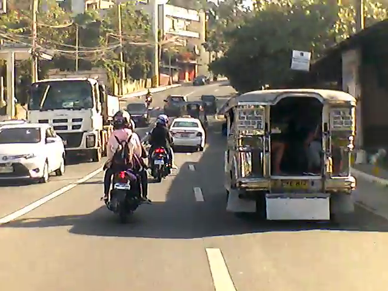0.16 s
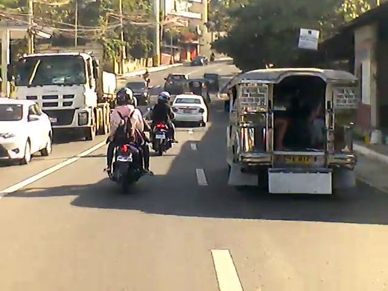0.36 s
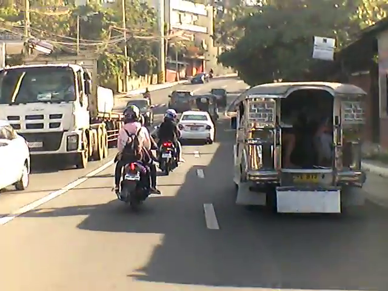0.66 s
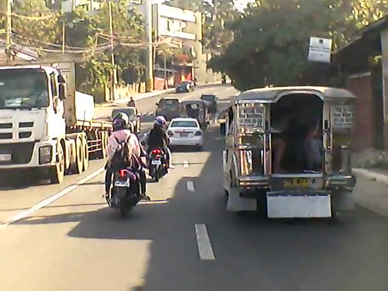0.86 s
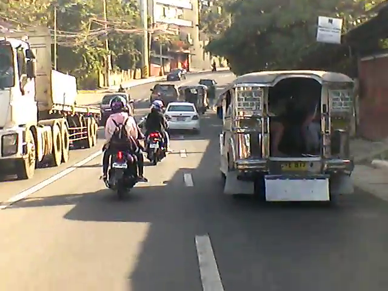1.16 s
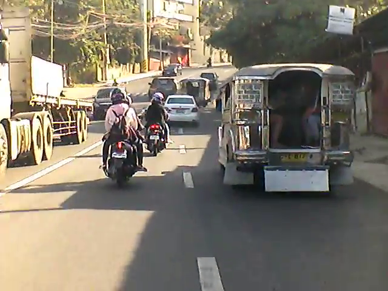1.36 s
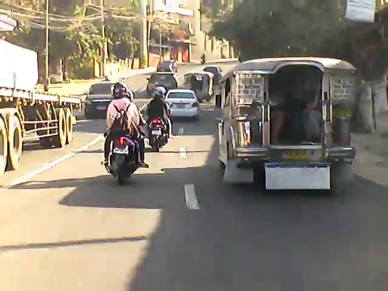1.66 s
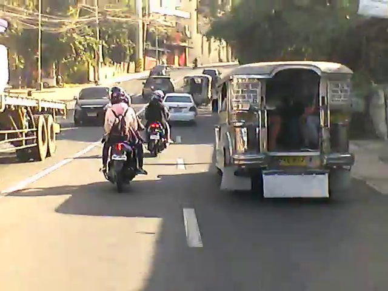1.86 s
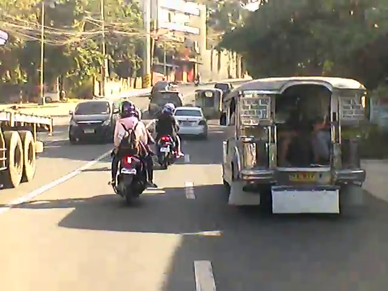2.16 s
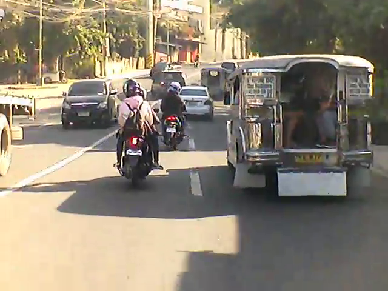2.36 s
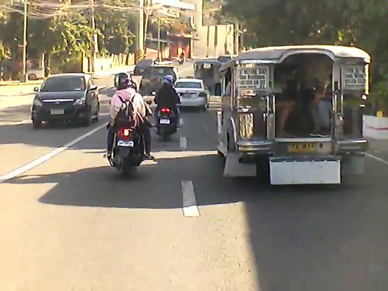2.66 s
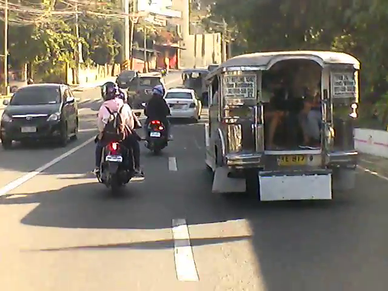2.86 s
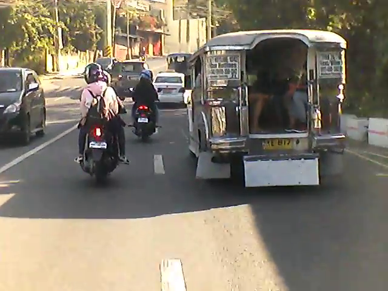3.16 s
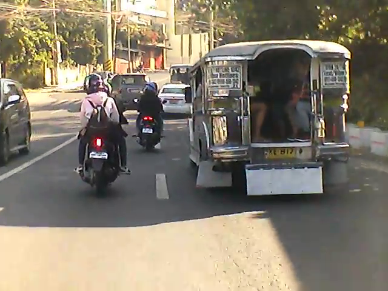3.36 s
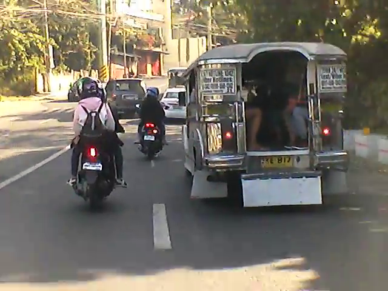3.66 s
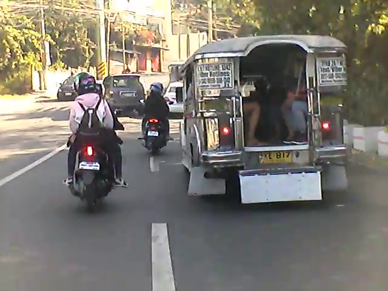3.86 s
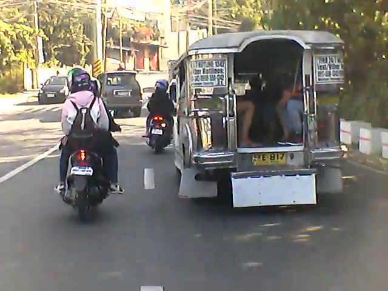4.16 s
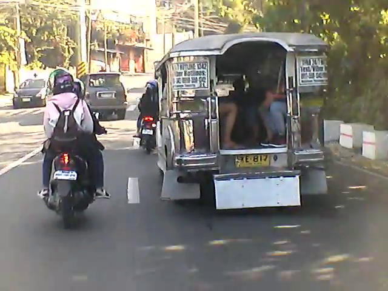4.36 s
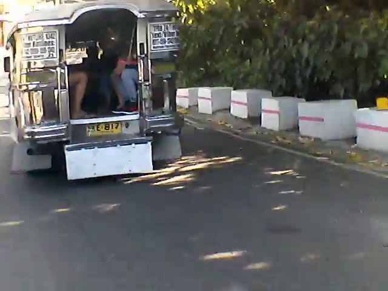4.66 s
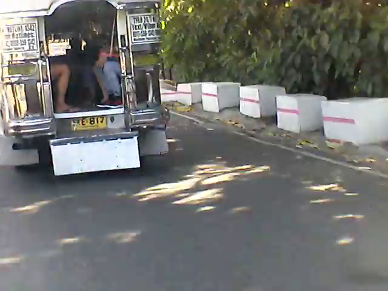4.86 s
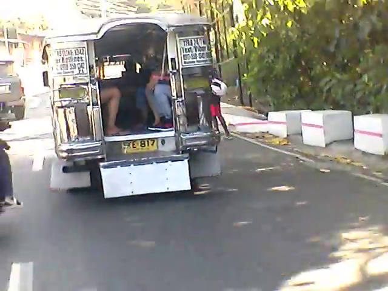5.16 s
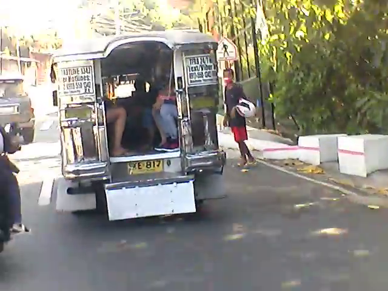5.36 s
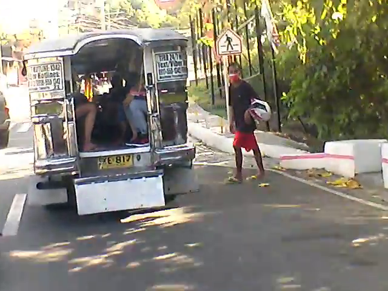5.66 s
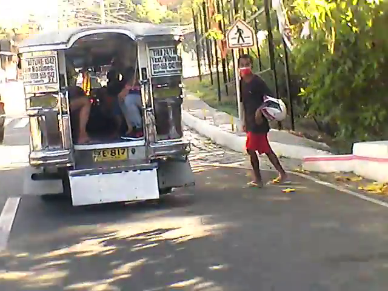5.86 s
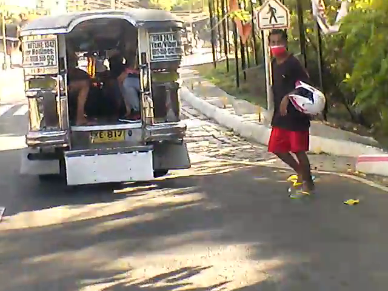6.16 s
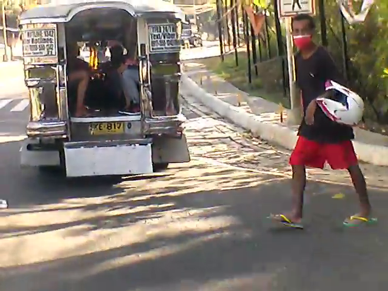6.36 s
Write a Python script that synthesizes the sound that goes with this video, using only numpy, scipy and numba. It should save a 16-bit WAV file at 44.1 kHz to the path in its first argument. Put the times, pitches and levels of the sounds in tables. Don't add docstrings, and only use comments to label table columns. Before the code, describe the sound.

A camera microphone rides on a small single-cylinder motorcycle on an open road. From 0 s the engine throbs low and fast, about forty firings a second, in rumbling wind and tyre roar; a car's thin spray hisses by around 0.5 s. At 0.8-0.9 s it shifts up and the throb drops, then pulls steadily. Wind slaps burst at 0.6-1.0, 1.35, 1.6 and strongly near 2.3-2.4 s, with hard bumps thumping the frame. A lorry's gear whine wavers at 1.3-2.4 s. A diesel drone ahead grows strongest around 3.2-3.8 s, with a knock, short falling tone and rattles near 3.5 s. From 4 s the throttle closes; firing slows and turns uneven while wind and road noise ease. At 5.45 s the gain jumps up. Slow engine thuds, a low faint whine, light clicks at 6.0-6.2 s and tiny brake chirps finish at 6.5 s.

```python
import sys
import numpy as np
from scipy import signal
from scipy.fft import rfft, irfft
from scipy.io import wavfile
from scipy.ndimage import uniform_filter1d
from numba import njit

SR = 44100
rng = np.random.default_rng(int(sys.argv[2]) if len(sys.argv) > 2 else 0)


def dump_mix(stems):
    frames = np.atleast_2d(stems).T
    limited = np.clip(frames, -1, 1)
    pcm = np.round(limited * 32767).astype(np.int16)
    wavfile.write(sys.argv[1], SR, pcm)


def voltage_ratio(decibels):
    exponent = np.asarray(decibels, float) / 20
    return 10 ** exponent


N = 287091
TIME_S = np.arange(N) / SR


def level(x, rms_db):
    return x * voltage_ratio(rms_db) / np.sqrt(np.mean(x ** 2))


def curves(table):
    t_s, *columns = np.transpose(table)
    return [np.interp(TIME_S, t_s, c) for c in columns]


def walk(rate_hz):
    hold = int(SR / rate_hz)
    steps = np.repeat(rng.standard_normal(N // hold + 1), hold)
    return 1.31 * uniform_filter1d(uniform_filter1d(steps, hold), hold)[:N]


@njit
def resonance(x, f_hz, width_hz):
    y = np.empty(len(x))
    band, low = 0., 0.
    g = np.tan(np.pi * f_hz / SR)
    damping = width_hz / f_hz
    for i in range(len(x)):
        v = (band + g * (x[i] - low)) / (1 + g * (g + damping))
        band = 2 * v - band
        low = low + 2 * g * v
        y[i] = damping * v
    return y


def ring(x, f_hz, width_hz):
    return resonance(resonance(x, 1. * f_hz, 2. * width_hz), 1. * f_hz, 1. * width_hz)


def duct(x, colour):
    f_hz, gain_db = np.transpose(colour)
    bin_hz = np.fft.rfftfreq(N, 1 / SR) + 1
    log_gain = np.log(voltage_ratio(np.interp(np.log(bin_hz), np.log(f_hz), gain_db)))
    cepstrum = irfft(log_gain, N)
    cepstrum[1:N // 2] *= 2
    cepstrum[N // 2 + 1:] = 0
    return irfft(rfft(x) * np.exp(rfft(cepstrum)), N)


def noise_bursts(events):
    out, rub = np.zeros(N), rng.standard_normal(N + SR)
    for t_s, length_s, f_hz, width_hz, burst_db in events:
        at, size = int(t_s * SR), int(length_s * SR)
        burst = level(ring(rub[at:at + size], f_hz, width_hz), burst_db)
        out[at:at + size] += (burst * np.hanning(size) ** .5)[:N - at]
    return out


def engine():
    # t/s, firing rate/Hz, throb/dB, throttle [0-1]
    running = [(0, 40.8, -34.5, 1), (.4, 39.2, -34, 1), (.78, 38, -37, 1), (.92, 32.7, -34.5, .5),
               (1.4, 34.3, -35.5, .5), (2, 35.6, -38, .7), (2.5, 35.2, -37.5, .6), (3, 35.4, -37.5, .5),
               (3.5, 34.2, -36, .5), (4, 32.85, -38, .2), (4.5, 30.85, -39.5, 0), (5, 28.25, -39.5, 0),
               (5.45, 26.65, -41.5, 0), (5.75, 26, -44, 0), (5.82, 26, -47, 0), (6.05, 25.3, -48, 0),
               (6.15, 24.6, -42, 0), (6.51, 24.1, -42, 0)]
    # f/Hz, gain/dB
    exhaust = [(40, -32), (80, -11), (105, -4), (135, -5), (150, -4), (172, 0), (186, -3), (205, -15),
               (310, -14), (450, -32)]
    # f/Hz, gain/dB
    intake = [(40, -32), (80, -14), (117, -6), (160, -11), (176, 0), (200, -1), (220, -9), (300, -15),
              (450, -30)]
    # t/s, strength/dB
    uneven_firings = [(4.475, 2), (4.61, 3), (4.705, -5), (5.2, -3), (5.272, 6), (5.452, -5), (5.49, 4),
                      (5.565, -3), (5.606, 3), (5.643, 3), (5.69, -5), (5.72, 4), (5.758, 2), (6.188, 3),
                      (6.35, 3), (6.39, 2), (6.43, 2), (6.509, -4), (3.01, -3), (3.04, -3), (3.15, -2),
                      (3.18, -2), (4.19, -3), (4.32, -2), (4.38, -3), (4.84, -2), (4.13, 4), (3.1, 2),
                      (3.125, 2)]

    rate_hz, throb_db, throttle = curves(running)
    turns = np.cumsum(rate_hz) / SR - .03 + .022 * walk(12)
    cycle = np.floor(turns).astype(int) + 1
    firing_db = 1.5 * rng.standard_normal(N // 500)
    for t_s, strength_db in uneven_firings:
        firing_db[cycle[int(t_s * SR)]] = strength_db
    strength = voltage_ratio(firing_db)[cycle]

    new_cycle = np.maximum(np.diff(cycle, prepend=cycle[0]), 0)
    pulses = new_cycle * strength * 33 / rate_hz
    thud = signal.sosfilt(signal.butter(2, 500, fs=SR, output="sos"), pulses)
    pipe = (1 - throttle) * duct(thud, exhaust) + throttle * duct(thud, intake)
    puff = strength * np.exp(-(turns % 1) / 0.15)
    gas = puff * resonance(rng.standard_normal(N), 900., 540.)
    return voltage_ratio(throb_db) * (level(pipe, 2) + level(gas, -19))


def swells():
    surges = [(.33, 1.5, .05), (.635, 7.5, 0.032), (.76, 4, 0.032), (1.43, -1, 0.055), (1.86, 8, .03),
              (2.39, 8.5, 0.045), (2.649, 4, .06), (2.96, 2, 0.045), (3.82, 6, 0.064), (5.47, 0.5, 0.031)]
    attack_s = 0.035
    peak_s, rise_db, release_s = np.transpose(surges)[:, :, None]
    late_s = TIME_S - peak_s
    rising = np.clip(1 + late_s / attack_s, 0, 1)
    falling = np.exp(-np.abs(late_s) / release_s)
    return np.sum(rise_db * np.where(late_s < 0, rising, falling), axis=0)


def air():
    part_hz = [60, 350, 1250, 4200]
    # f/Hz, density/dB per Hz
    colour = [(12, -51), (25, -29), (40, -21), (55, -8.5), (95, -7.5), (165, -2.5), (215, -7.5),
              (330, -5.5), (950, -14), (1160, -16.5), (1600, -18), (2200, -29.5), (3700, -33.5),
              (5360, -43.5), (7200, -43.5)]
    # t/s, level/dB
    road = [(0, 1), (.23, 3.5), (.64, 4), (.9, 3.5), (1.11, 1.5), (1.79, 3.5), (2.41, 2.5), (3.11, 1.5),
            (4.6, -1), (4.73, -3), (4.93, -1), (5.3, -2), (5.44, -5), (5.46, -3), (5.85, -2.5), (6.17, -3),
            (6.2, -1.5), (6.51, -2)]
    # t/s, level/dB
    wind = [(0, 3), (1.1, 5.5), (1.29, 0.5), (1.55, 8), (1.72, 6), (1.83, -1), (2.25, 3), (2.55, 2),
            (3.06, -4), (3.2, 0), (3.38, 4), (3.75, -3), (4.1, 1.5), (4.32, -4.5), (4.45, 0), (4.7, -3.5),
            (5.1, -5), (6.51, -9)]
    wind_share = [0.71, 0.84, 0.14, .05]
    swell_share = [0.27, 1, 0.4, .1]
    road_share = [.05, .05, .6, 0.8]

    parts_db = np.outer(wind_share, curves(wind))
    parts_db += np.outer(swell_share, swells())
    parts_db += np.outer(road_share, curves(road))
    parts_db[0] += 2 * walk(9)
    change_db = parts_db - parts_db.mean(axis=1, keepdims=True)

    bin_hz = np.fft.rfftfreq(N, 1 / SR) + 1
    colour_hz, colour_db = np.transpose(colour)
    gain = voltage_ratio(np.interp(np.log(bin_hz), np.log(colour_hz), colour_db))
    noise = rfft(rng.standard_normal(N)) * gain
    eddies, shimmer = walk(25.02), walk(15)
    out = 0
    for step in np.arange(-1, 19):
        band_hz = 25 * 2 ** (step / 2)
        share = np.cos(np.pi / 2 * np.clip(2 * np.log2(bin_hz / band_hz), -1, 1)) ** 2
        place = np.interp(np.log(band_hz), np.log(part_hz), range(4))
        low = min(int(place), 2)
        band_db = change_db[low] + (place - low) * (change_db[low + 1] - change_db[low])
        windy = np.exp(-np.log(band_hz / 300) ** 2 / 1.3)
        band_db = band_db + 1.2 * windy * eddies + .5 * (1 - windy) * shimmer + .5 * walk(12)
        out = out + voltage_ratio(band_db) * irfft(noise * share, N)
    return level(out, -31.0)


def diesel():
    # t/s, firing rate/Hz, level/dB
    running = [(0, 41, -45), (1.3, 43, -44), (2.2, 43, -52), (2.6, 43, -48), (3.2, 44.2, -40),
               (3.8, 41.8, -40), (4.4, 39.3, -46), (5.4, 40, -49), (5.9, 40.6, -49), (6.51, 41.4, -47)]
    orders = [(1, -13), (2, 0), (3, -5)]
    rate_hz, near_db = curves(running)
    angle = 2 * np.pi * np.cumsum(rate_hz * (1 + 0.012 * walk(6))) / SR
    drone = 0
    for multiple, order_db in orders:
        drone = drone + voltage_ratio(order_db + 3.5 * walk(6.3)) * np.sin(multiple * angle)
    return voltage_ratio(near_db) * drone


def car():
    passes_s, lasts_s = .5, 0.37
    spray = level(ring(rng.standard_normal(N), 6040, 2200), -60)
    return spray / (1 + ((TIME_S - passes_s) / lasts_s) ** 4)


def thumps():
    # t/s, length/s, f/Hz, width/Hz, level/dB
    bumps = [(.742, 0.017, 240, 120, -25.5), (2.364, .018, 350, 130, -31), (2.394, 0.018, 260, 79, -25.5),
             (2.405, 0.028, 495, 170, -33), (3.44, 0.046, 188, 72, -31), (6.36, .14, 435, 89, -47.5),
             (0.935, 0.081, 175, 58, -29), (1.34, 0.048, 169, 58, -24), (1.467, .05, 180, 110, -28),
             (2.05, 0.15, 49, 22, -42), (2.3, 0.19, 48, 30, -39), (2.662, .12, 42, 20, -41),
             (2.904, 0.13, 42, 20, -40), (3.256, 0.035, 154, 79, -28.5), (4.4, 0.05, 168, 40, -35),
             (4.12, .12, 43, 20, -41), (5.52, 0.11, 45, 22, -47), (5.57, 0.18, 79.4, 34, -44.5),
             (6.386, 0.035, 120, 70, -42), (2.372, 0.013, 310, 200, -25), (.748, 0.015, 300, 150, -28),
             (.782, .014, 190, 130, -25), (.655, .012, 850, 300, -36), (3.486, .012, 195, 150, -26),
             (2.657, .014, 260, 120, -27), (.029, 0.012, 170, 140, -27), (6.48, 0.012, 200, 120, -32),
             (6.397, .012, 99, 100, -38)]
    return noise_bursts(bumps)


def chirps():
    # t/s, length/s, f/Hz, width/Hz, level/dB
    rubs = [(.66, .06, 4700, 1500, -59), (.67, .05, 6850, 400, -63), (1.77, .06, 1300, 200, -45),
            (1.77, .07, 2200, 300, -52), (1.79, .03, 4500, 3000, -60), (2.25, .3, 6020, 250, -65),
            (2.335, .045, 5980, 120, -61), (2.455, .025, 6000, 120, -65), (2.503, .025, 5940, 100, -64),
            (2.1, .6, 7100, 500, -65), (.69, .05, 1270, 100, -45), (3.43, .06, 1600, 900, -46),
            (3.55, .2, 1450, 150, -49), (3.485, .05, 615, 70, -37), (3.64, .03, 5500, 2500, -60),
            (5.452, .012, 800, 600, -39), (6.0385, .009, 600, 100, -29), (6.18, .007, 6850, 300, -59),
            (6.187, .004, 7000, 900, -48), (6.186, .005, 5000, 5000, -53), (6.195, .06, 4200, 450, -62),
            (6.195, .09, 6900, 700, -66), (6.245, .03, 4200, 300, -61), (6.295, .02, 3400, 500, -57),
            (6.24, .07, 3500, 500, -59), (6.425, .05, 4150, 80, -60.5), (5.452, .02, 4000, 2500, -59),
            (.06, .06, 4085, 120, -56), (.27, .05, 6535, 100, -64), (6.455, .018, 3950, 250, -58),
            (3.635, .03, 4510, 300, -63), (6.445, .055, 5050, 150, -66), (3.85, .04, 790, 80, -43),
            (2.6, 1, 590, 14, -45), (3.805, .04, 220, 70, -29), (3.83, .07, 370, 60, -33),
            (.615, .06, 340, 120, -33), (4.4, .3, 487, 16, -44), (5.9, .6, 1450, 300, -58),
            (5.5, 1, 4000, 1000, -68)]
    return noise_bursts(rubs)


def gusts():
    # t/s, peak/dB, f/Hz, decay/s
    slaps = [(0.627, -15, 344, 0.076), (0.738, -11, 229, 0.041), (0.951, -11, 180, 0.067),
             (1.353, -20, 183, 0.065), (1.449, -30, 184, 0.058), (1.599, -19, 170, 0.088),
             (1.854, -32, 355, 0.085), (2.268, -9.5, 190, 0.081), (2.344, -22, 207, 0.059),
             (2.373, -25, 315, 0.08), (2.401, -14, 262, 0.05), (2.577, -25, 221, 0.11),
             (3.264, -28, 206, 0.08), (3.444, -24, 175, 0.059), (3.819, -19, 186, 0.088),
             (3.921, -31, 352, 0.087), (6.039, -22, 300, 0.07)]
    out, turbulence = np.zeros(N), rng.standard_normal(N)
    late_s = TIME_S[:SR // 4]
    for t_s, peak_db, f_hz, decay_s in slaps:
        at = int(t_s * SR)
        end = at + len(late_s)
        burst = level(ring(turbulence[at:end], f_hz, 0.5 * f_hz), peak_db - 12.0)
        attack = 1 - np.exp(-late_s / 0.0015)
        decay = np.exp(-np.log(1000) * late_s / (3 * max(decay_s, .01)))
        out[at:end] += burst * attack * decay
    return out


def lorry():
    # t/s, f/Hz, level/dB
    tones = [
        [(1.3, 325, -55), (1.6, 327, -44), (1.78, 328, -41), (1.84, 331, -46), (1.9, 334, -35.5),
         (2.05, 337, -36), (2.2, 340, -37), (2.33, 341, -35), (2.4, 340, -60)],
        [(5.7, 186, -61), (5.9, 186, -47), (6.3, 185, -47), (6.45, 184, -56)],
        [(3.47, 650, -58), (3.5, 632, -42), (3.55, 595, -47), (3.63, 540, -56)],
        [(3.5, 1310, -58), (3.59, 1320, -45), (3.65, 1300, -46), (3.69, 1320, -58), (3.78, 1350, -56)],
        [(6.43, 5020, -78), (6.46, 5050, -72), (6.49, 5050, -75), (6.51, 5040, -76)],
    ]
    out = 0
    for tone in tones:
        f_hz, near_db = curves(tone)
        sounding = (TIME_S > tone[0][0]) & (TIME_S < tone[-1][0])
        angle = 2 * np.pi * np.cumsum(f_hz * (1 + .006 * walk(20))) / SR
        out = out + sounding * np.sqrt(2) * voltage_ratio(near_db + 2 * walk(18)) * np.sin(angle)
    return out


def scene():
    motorcycle = engine() + thumps() + chirps()
    traffic = diesel() + car() + lorry()
    return (motorcycle + traffic + air() + gusts())[None]


def low_pass(x):
    return signal.sosfilt(signal.butter(12, 9200, fs=SR, output="sos"), x)


def record(dry):
    # f/Hz, width/Hz, gain/dB
    housing = [(3850, 300, 1), (3550, 250, -5.5), (3276, 100, -3.5), (3120, 68, 0.5), (1580, 1000, 1),
               (2050, 150, 0)]
    # f/Hz, gain/dB
    mirror = [(8000, -60), (8500, -15), (8800, -27), (9150, -45), (9250, -90)]
    gain_step_s, gain_step_db, converter_hz = 5.453, 6, 16000

    x = dry[0] * voltage_ratio(gain_step_db * (TIME_S > gain_step_s))
    for f_hz, width_hz, gain_db in housing:
        x = x + (voltage_ratio(gain_db) - 1) * resonance(x, 1. * f_hz, 1. * width_hz)
    x = signal.sosfilt(signal.cheby2(16, 58, 7620, fs=SR, output="sos"), x)

    mirror_hz, mirror_db = np.transpose(mirror)
    leak = voltage_ratio(np.interp(np.fft.rfftfreq(N, 1 / SR), mirror_hz, mirror_db, -200, -200))
    carrier = np.cos(2 * np.pi * converter_hz * TIME_S)
    mirrored = 2 * x * signal.windows.tukey(N, .02) * carrier
    x = x + irfft(rfft(mirrored) * leak, N)
    return low_pass(x[None])


dry = scene()
out = record(dry)
dump_mix(out)
```